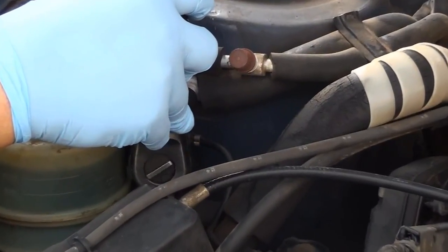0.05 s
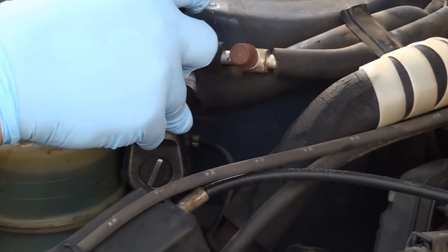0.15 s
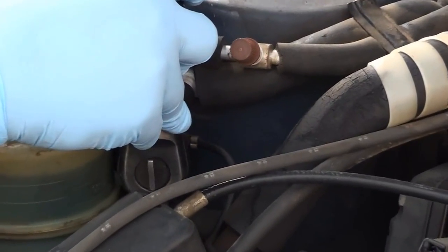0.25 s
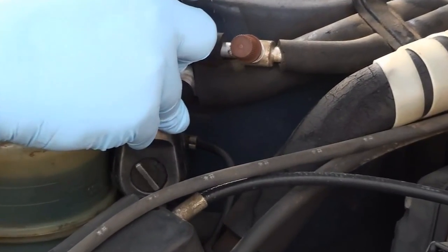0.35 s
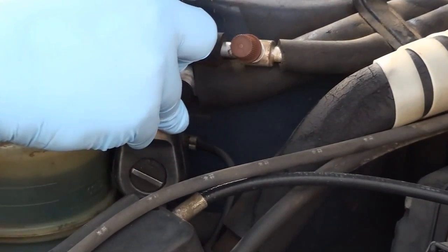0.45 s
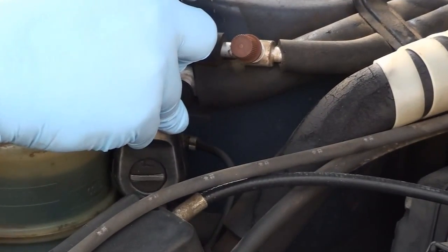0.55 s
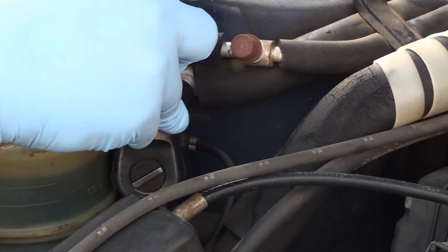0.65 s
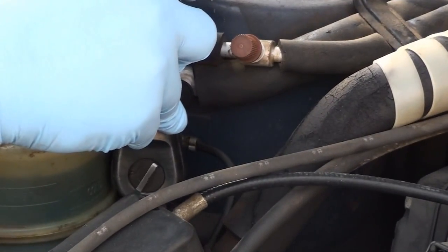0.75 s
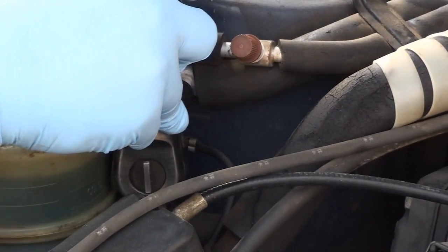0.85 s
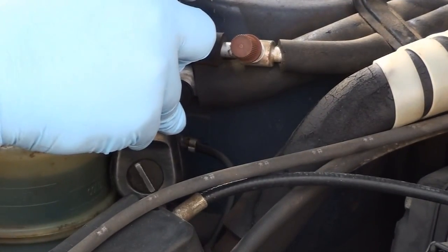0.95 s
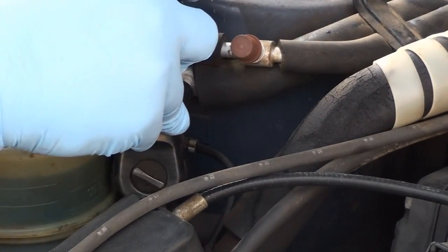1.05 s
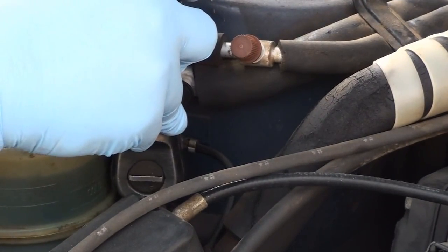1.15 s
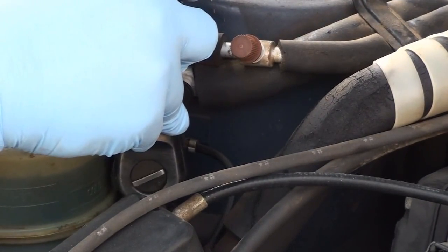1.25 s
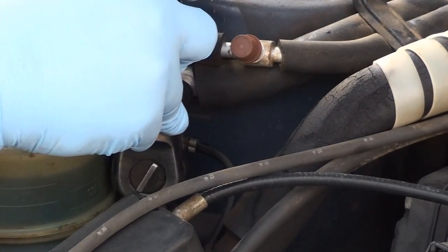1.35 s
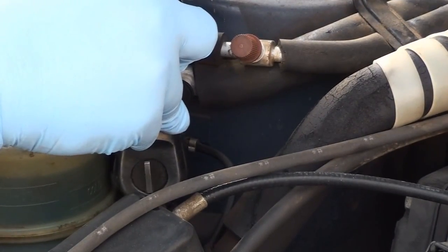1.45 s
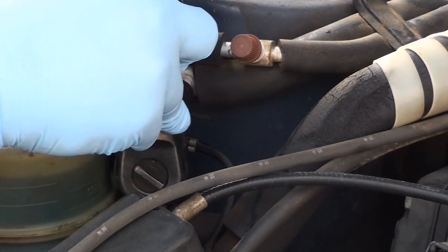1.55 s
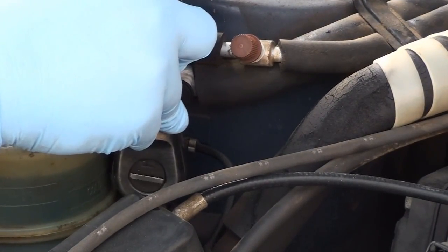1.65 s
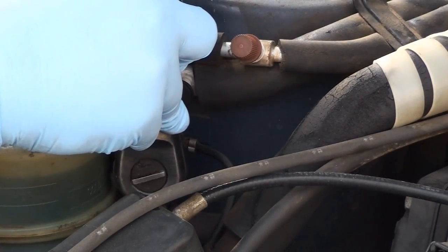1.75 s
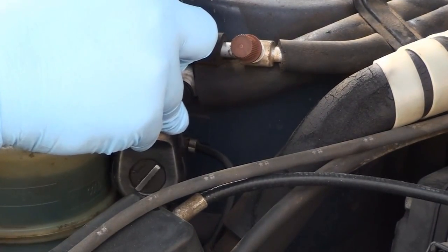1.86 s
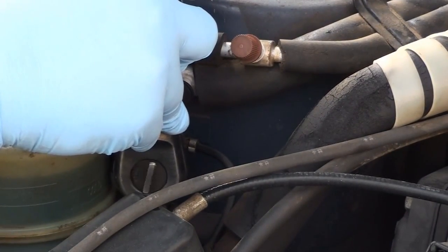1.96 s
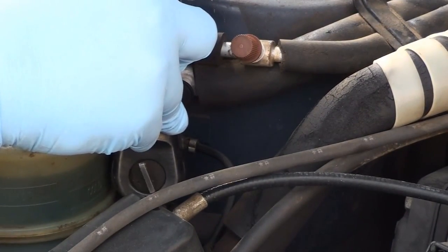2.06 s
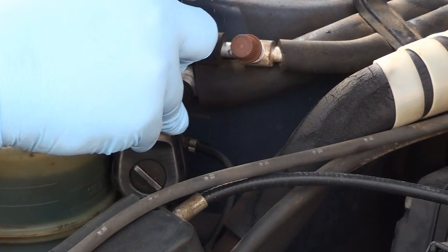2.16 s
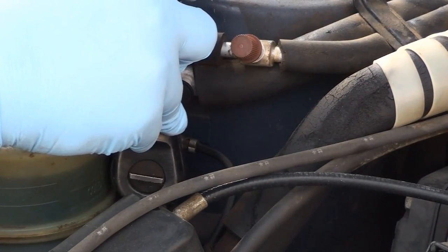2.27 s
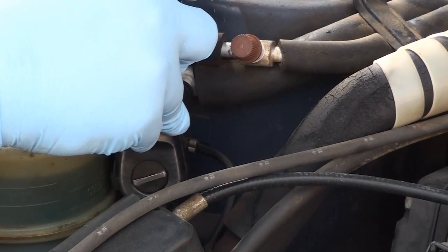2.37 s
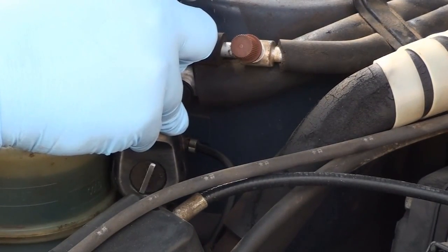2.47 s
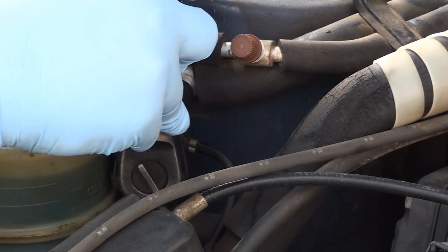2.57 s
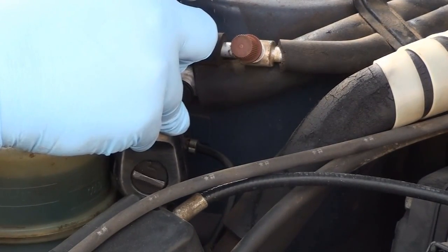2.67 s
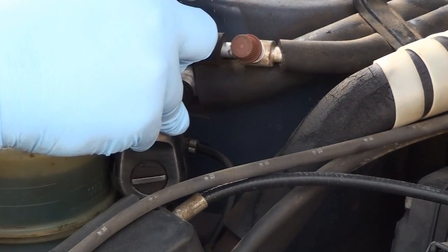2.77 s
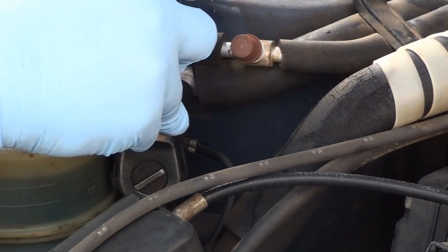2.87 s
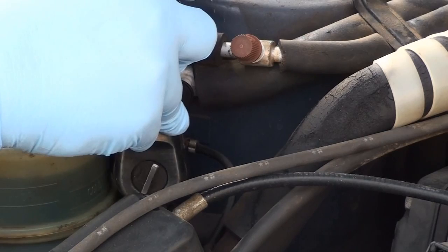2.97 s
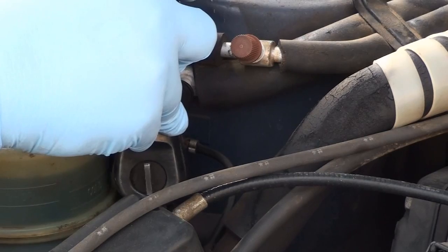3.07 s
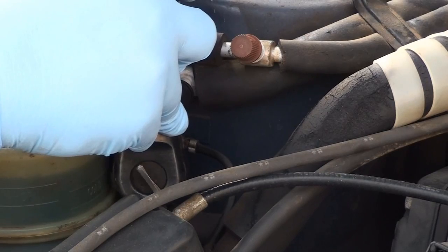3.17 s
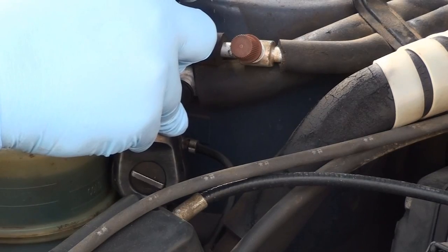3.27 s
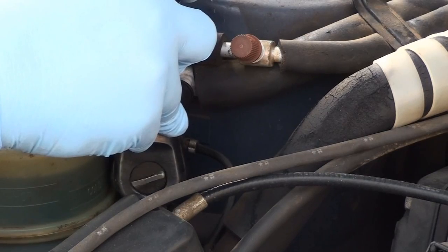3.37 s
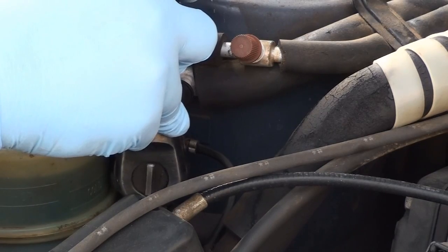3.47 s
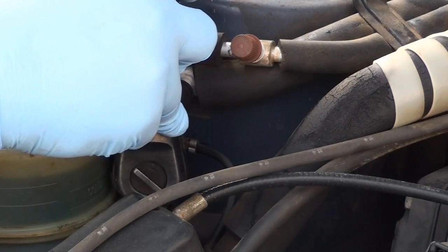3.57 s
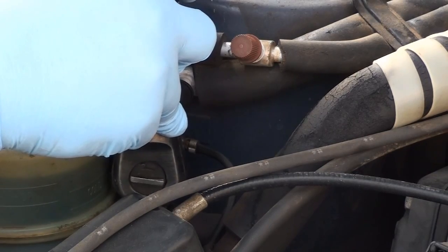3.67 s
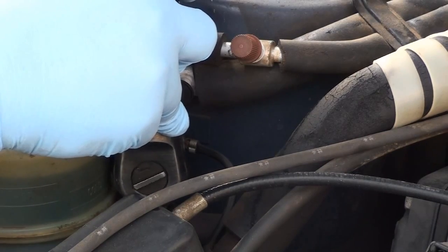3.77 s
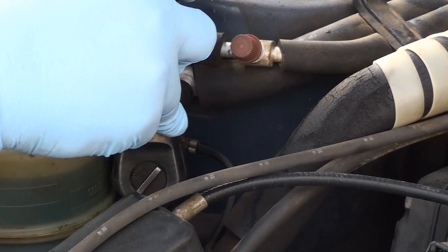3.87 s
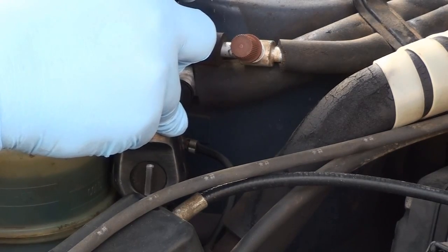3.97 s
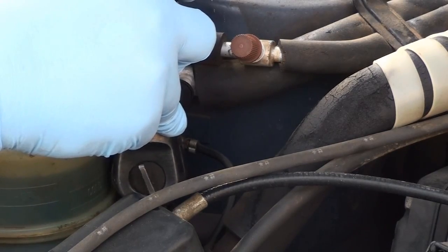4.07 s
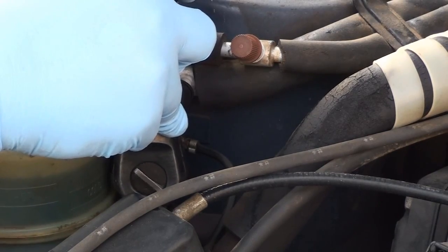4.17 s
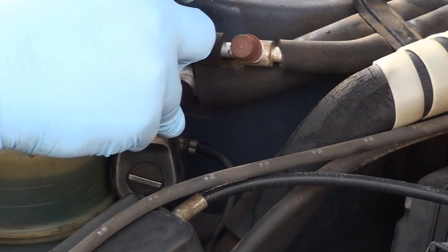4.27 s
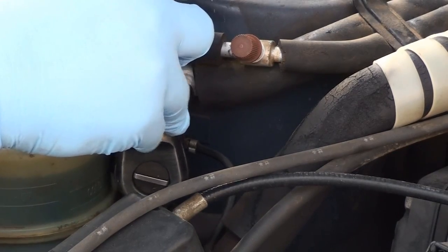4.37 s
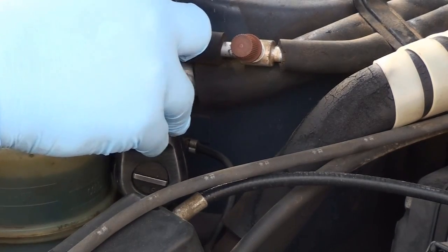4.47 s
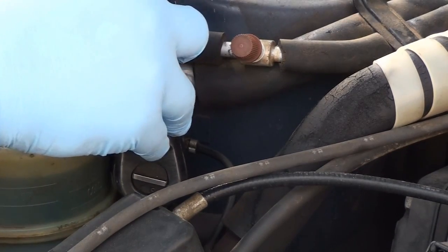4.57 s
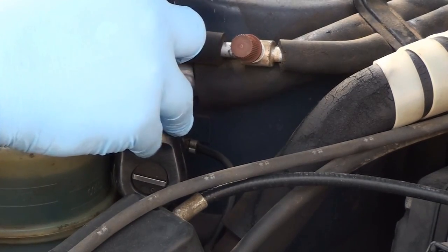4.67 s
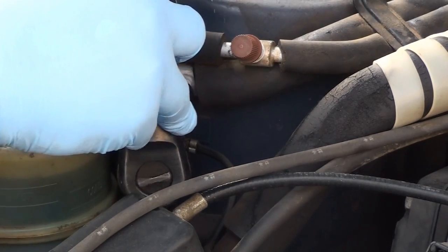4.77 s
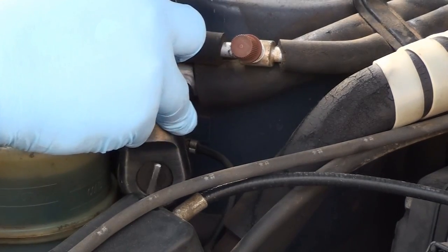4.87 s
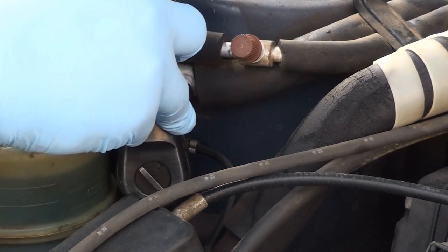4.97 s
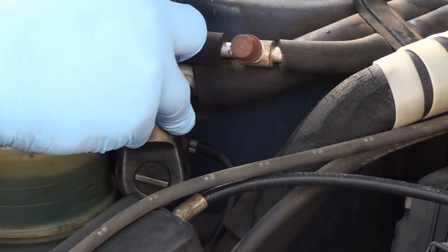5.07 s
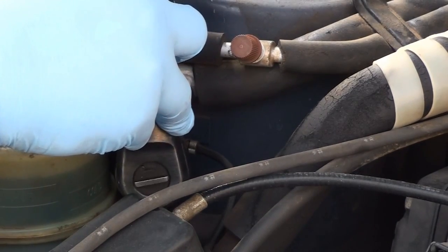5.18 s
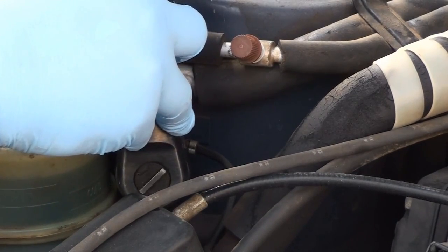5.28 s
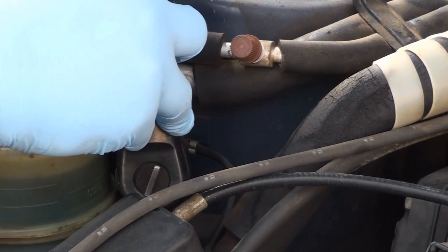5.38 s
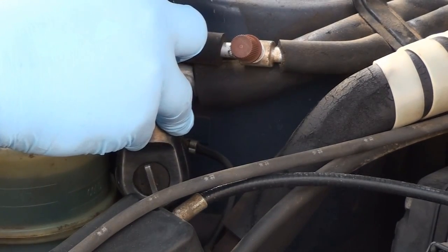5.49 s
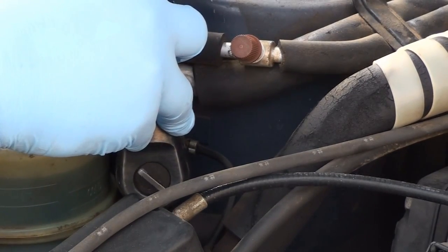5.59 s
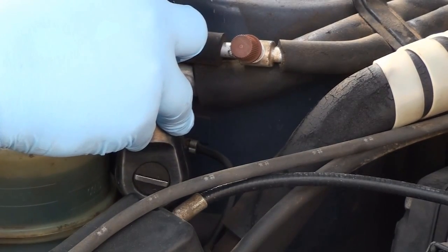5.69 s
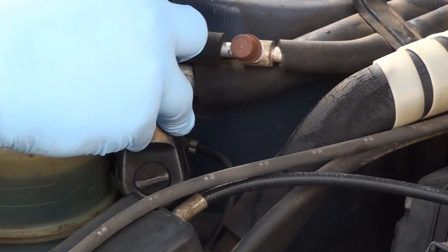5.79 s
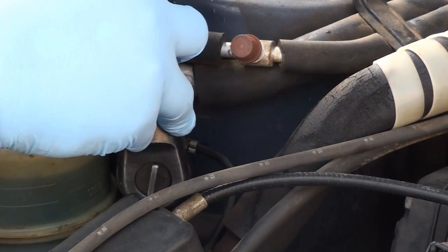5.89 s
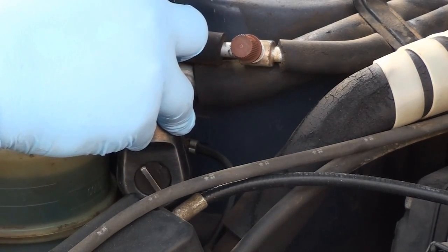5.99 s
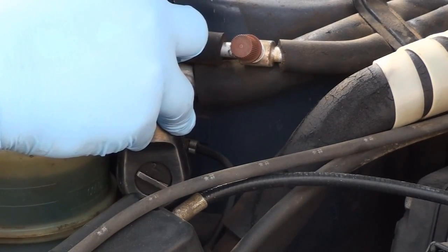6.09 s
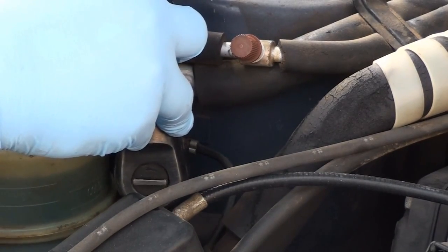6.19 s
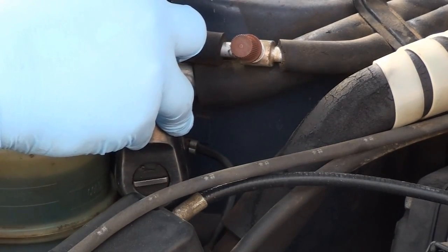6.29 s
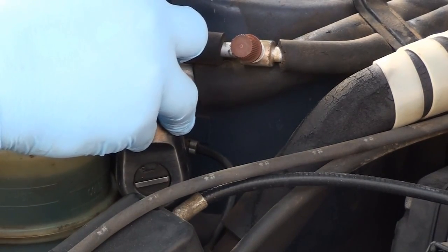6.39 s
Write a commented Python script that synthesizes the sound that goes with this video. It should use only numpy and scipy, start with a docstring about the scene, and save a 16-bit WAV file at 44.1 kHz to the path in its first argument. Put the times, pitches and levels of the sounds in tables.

```python
"""An air ratchet turns a bolt in an engine bay, one long run and one short run, close to an overloaded microphone.
Its four-vane air motor whines in orders of the vane rate and, when slow, puffs singly into a ringing muffler.
Exhaust air hisses as port-shaped noise pulsing with the motor. A geared-down crank rocks the ratchet head,
so a pawl ticks and the yoke knocks; when the trigger closes the motor chugs down over faint yard noise."""
import sys
import numpy as np
from scipy import signal
from scipy.fft import rfft, irfft, next_fast_len
from scipy.io import wavfile

SR = 44100
rng = np.random.default_rng(int(sys.argv[2]) if len(sys.argv) > 2 else 0)


def inscribe(sig):
    """Save sig as 16-bit PCM at rate SR to the path in sys.argv[1].

    A 1-D sig is mono; a 2-D sig holds one channel per row.
    Samples are clipped to [-1, 1] before scaling.
    """
    pcm = np.round(np.clip(np.atleast_2d(sig).T, -1, 1) * 32767)
    wavfile.write(sys.argv[1], SR, pcm.astype(np.int16))


N = 284004


def from_db(db):
    """Decibels to gain."""
    return 10 ** (np.asarray(db) / 20)


def rms_one(x):
    """Scaled to rms 1."""
    return x / np.sqrt(np.mean(x ** 2) + 1e-20)


def in_time(rows):
    """The second column of a table as a curve over all samples."""
    s, values = np.transpose(rows)
    return np.interp(np.arange(N) / SR, s, values)


def at_hz(points, hz):
    """A spectrum table read on a log-frequency axis."""
    table_hz, values = np.transpose(points)
    return np.interp(np.log(np.maximum(hz, 1)), np.log(table_hz), values)


def resonances_db(peaks, hz):
    """Sum of bell-shaped peaks and dips in dB, each width taken at half its dB height."""
    return sum(db / (1 + (2 * (hz - top_hz) / width_hz) ** 2) for top_hz, width_hz, db in peaks)


def bumps_in_time(rows):
    """Sum of bell-shaped level changes in dB; rows are (time [s], half length [s], level [dB])."""
    t = np.arange(N) / SR
    return sum(db * np.exp(-((t - s) / half_s) ** 2) for s, half_s, db in rows)


def drift(rate):
    """Slow chance with spread 1: noise at a sixteenth of the sample rate through two poles at rate [Hz]."""
    step = 16   # samples
    r = np.exp(-2 * np.pi * rate * step / SR)
    noise = rng.standard_normal(N // step + 4002)
    slow = signal.lfilter([1], [1, -2 * r, r * r], noise)[4000:]   # settled part only
    return np.interp(np.arange(N) / step, np.arange(len(slow)), rms_one(slow))


def ring(clicks, hz, t60):
    """Two-pole resonator: a unit click sets a sine of about height 1 ringing, down 60 dB after t60 [s]."""
    r, w = from_db(-60 / (t60 * SR)), 2 * np.pi * hz / SR
    return signal.lfilter([0, np.sin(w)], [1, -2 * r * np.cos(w), r * r], clicks + 1e-18)


def stereo_noise(gain, likeness):
    """Two-channel noise with a gain for each frequency bin and a set left-right likeness; rms 1."""
    alike = np.clip(at_hz(likeness, np.fft.rfftfreq(N, 1 / SR)), 0, 1)
    mid, side = rfft(rng.standard_normal((2, N)))
    spectrum = np.sqrt(1 + alike) * mid + np.sqrt(1 - alike) * side * [[1], [-1]]
    return rms_one(irfft(gain * spectrum, N))


def once_a_turn(turns):
    """Unit clicks where a count of turns passes a whole number."""
    return np.maximum(np.diff(np.floor(turns), prepend=np.floor(turns[0])), 0)


def filtered(x, response):
    """A frequency response, given as a function of Hz, applied with room for its tail."""
    size = next_fast_len(N + 8192)
    return irfft(rfft(x, size) * response(np.fft.rfftfreq(size, 1 / SR)), size)[..., :N]


def surge(since, rise_s, top_db, fall_db_per_s):
    """A level that climbs to its top soon after a moment, then falls steadily."""
    late = since - rise_s
    return top_db + np.minimum(35 * late / rise_s, -fall_db_per_s * late)


def one_run(speed, opens, closes, drain_db_per_s, empty_s):
    """Vane rate, hiss, whine fade and chug level that follow from one pull of the trigger."""
    t = np.arange(N) / SR
    on, off = t - opens, np.maximum(t - closes, 0)

    # share of loaded speed: quarter-sine climb, then coasting down exponentially
    spin_up_s, run_down_s = .085, .057
    share = np.sin(np.pi / 2 * np.clip(on / spin_up_s, 0, 1)) * np.exp(-off / run_down_s)

    # a leak precedes full air
    leak_db, leak_lead_s, leak_s = -13.3, .007, .011
    opening_db = np.interp(on + leak_lead_s, [-.003, .003, leak_s, leak_s + .004],
                           [-80, leak_db, leak_db, 0])
    run_out_db_per_s = 400   # on top of the draining
    hiss_db = -12.7 + opening_db - drain_db_per_s * off - run_out_db_per_s * np.maximum(off - empty_s, 0)

    # the whine forms late, breaks fast and is weaker below speed
    forms_s, edge_db_per_s, slow_loss_db = .042, 3200, 25
    fade_db = edge_db_per_s * (np.minimum(on - forms_s, 0) - off) - slow_loss_db * (1 - share)

    start_db = surge(on, rise_s=.022, top_db=-13, fall_db_per_s=480)
    stop_db = surge(t - closes, rise_s=.01, top_db=-14, fall_db_per_s=290)
    idle_db = -50 + fade_db
    chug_db = np.max([start_db, stop_db, idle_db], axis=0)
    return share * in_time(speed), hiss_db, fade_db, chug_db


def motor():
    """Two trigger pulls joined: the stronger run sets vane rate, hiss, whine fade and chug at each moment."""
    # motor speed under load with the trigger held: (time [s], vane rate [Hz])
    long_run = [(0.03, 771.8), (0.07, 779.2), (0.27, 776.2), (0.33, 766.5), (0.59, 773.2), (0.97, 772.2),
                (1.25, 767.2), (1.33, 774.5), (1.45, 775.3), (1.47, 771.0), (2.09, 775.7), (2.21, 767.7),
                (2.47, 765.7), (2.53, 754.4), (2.69, 766.9), (3.31, 771.9), (3.47, 754.1), (3.71, 771.6),
                (3.87, 772.6), (4.13, 767.7), (4.19, 756.8), (4.215, 746)]
    short_run = [(4.8, 866), (4.862, 865), (4.93, 837), (5.03, 824), (5.14, 806.9), (5.22, 795.7),
                 (5.44, 778.5), (5.58, 770), (5.77, 767.5), (5.93, 754.5), (6.0, 763), (6.08, 765),
                 (6.14, 748), (6.185, 725)]
    # trigger pulls: (opens [s], closes [s], air drains [dB/s], air runs out after closing [s])
    trigger = [(-1, 4.224, 180, .255), (4.709, 6.189, 215, .14)]
    runs = [one_run(speed, *pull) for speed, pull in zip((long_run, short_run), trigger)]
    floors = [[5], [-90], [-60], [-90]]
    return np.maximum(np.max(runs, axis=0), floors)


def crank_turns(vanes):
    """The gears turn the crank 3 times for 17 rotor turns of four vanes; each run has its own crank angle."""
    # one pawl drop in each run, where the crank count is zero: (long run [s], short run [s])
    pawl_drops = (.064, 4.861)
    first, second = [vanes[round(s * SR)] for s in pawl_drops]
    t = np.arange(N) / SR
    return 3 / 17 / 4 * (vanes - np.where(t < 4.6, first, second))


def whine(vanes, vane_hz, crank, fade_db):
    """Vane tones: crank load wobbles phase and strength, slip blurs high orders, which form last, break first."""
    # whine orders: (multiple of vane rate [1], level at full air before bay peaks and swells [dB])
    orders = [(1, -19.1), (2, -24.6), (3, -15), (4, -27.6), (5, -24.5), (6, -30.5), (7, -42.7), (8, -37.5),
              (9, -31.6), (10, -26.3), (11, -31.5), (.75, -45.5), (5.25, -45), (5.75, -42), (8.5, -39.5),
              (12, -31.5), (13, -33.5), (14, -33.5), (15, -40)]
    # narrow engine bay peaks and dips, crossed as the speed changes: (frequency [Hz], width [Hz], level [dB])
    bay_peaks = [(761, 31, -5.8), (795, 43, 4.2), (829, 31, -10.9), (1513, 18, -15), (1566, 20, -14.4),
                 (2165, 60, -9), (2305, 125, -21.5), (2611, 156, -16.8), (2930, 70, -9), (3025, 116, 6),
                 (3226, 49, -5.9), (3350, 83, 10.9), (3680, 150, 6.5), (3797, 45, -6.5), (3961, 51, -15.1),
                 (4177, 25, -8.3), (4430, 80, 6), (4577, 68, -6.2), (5170, 90, 3), (5496, 328, 16),
                 (6133, 110, 6.5), (6390, 170, 8), (6856, 193, 7.6), (7366, 102, 9.6), (7686, 102, -15.2),
                 (8146, 49, -18.3), (8411, 150, 9), (10330, 150, 7), (11451, 173, 11.4)]
    # single whine orders swell or sink for a moment:
    # (order [1], time [s], half length [s], level [dB])
    swells = [(1, 1.1, .3, -2.5), (2, .05, .2, -7), (3, .2, .3, -8), (3, 1.5, .6, 5), (4, 1.6, .4, -1.5),
              (5, .1, .25, -5), (5, 1.15, .25, 4), (5, 2.55, .09, -4), (5, 3.65, .33, -4.5),
              (5, 5.98, .2, 3), (6, 1.9, .3, 2), (6, 5.8, .3, -5), (8, .6, .9, -3), (8, 3.9, .4, 3)]
    # stereo placing: (frequency [Hz], left minus right [dB])
    pan = [(770, -3), (1540, -5.5), (2310, -1.5), (3080, 2), (5400, -3.5), (12000, 1.5)]
    # stereo phase: (frequency [Hz], left ahead of right [rad])
    left_lead = [(60, 0), (770, -1.18), (1540, -1.94), (3080, -0.84), (5000, -0.98), (8000, 0.56)]

    strain = np.clip((767 - vane_hz) / 14, 0, 1)   # a motor slowed by load runs unevenly
    slip = (.035 + .028 * strain) * drift(120)
    flutter_db = .9 + 2.2 * strain
    angle = 2 * np.pi * vanes + 0.11 * np.sin(2 * np.pi * crank) + slip
    hz = np.arange(SR // 2)
    bay_db = resonances_db(bay_peaks, hz)

    tones = np.zeros(N)
    for k, db in orders:
        swell_db = bumps_in_time([row[1:] for row in swells if row[0] == k])
        level_db = db + swell_db + np.interp(k * vane_hz, hz, bay_db) + .8 * drift(4.7)
        breakup_db = fade_db * (1 + (k - 1) / 3)
        gain = np.sqrt(2) * from_db(level_db + breakup_db + flutter_db * drift(56))
        tones += gain * np.sin(k * angle + rng.uniform(0, 2 * np.pi))
    crank_load_db = 1.64 * np.cos(2 * np.pi * (crank - .8))

    def two_sides(hz):
        opposite = np.array([[1], [-1]])
        level = from_db(at_hz(pan, hz) / 2 * opposite)
        return level * np.exp(.5j * at_hz(left_lead, hz) * opposite)

    return filtered(tones * from_db(crank_load_db), two_sides)


def exhaust(vanes, crank, hiss_db):
    """Jet noise through the port resonances, pulsing with every vane, rotor turn and crank turn."""
    # jet spectrum, relative: (frequency [Hz], density [dB per Hz])
    jet_spectrum = [(30, -44), (100, -78), (250, -33.5), (600, -22), (900, -20), (1400, -23.5),
                    (2000, -21.5), (3000, -19.5), (5000, -19), (7500, -18), (10500, -12), (12500, -16.5),
                    (16000, -28), (20000, -14)]
    # exhaust port resonances and dips: (frequency [Hz], width [Hz], level above the plain jet [dB])
    nozzle = [(3530, 370, 4.5), (5490, 270, 6.5), (6340, 900, 6.5), (8350, 160, 12), (9880, 170, 9.5),
              (11360, 350, 7), (4600, 140, 2), (1315, 190, -6.5), (2630, 160, -3.5)]
    # (frequency [Hz], left-right likeness [0-1])
    likeness = [(60, 0.54), (130, 0.66), (290, 0.43), (640, 0.76), (1410, 0.24), (3100, 0.79), (6820, 0.78),
                (15000, 0.93)]
    # (frequency [Hz], left minus right [dB])
    balance = [(60, 0), (180, -6), (550, 7.5), (1650, -8), (4970, 0), (15000, 5)]

    hz = np.fft.rfftfreq(N, 1 / SR)
    plain_db = at_hz(jet_spectrum, hz) + at_hz(balance, hz) / 2 * [[1], [-1]]
    port_air = stereo_noise(from_db(plain_db + resonances_db(nozzle, hz)), likeness)
    plain_air = stereo_noise(from_db(plain_db), likeness)
    fast = np.clip((hiss_db + 30) / 14, .15, 1)   # share of the flow fast enough to excite the ports
    jet = np.sqrt(fast) * port_air + np.sqrt(1 - fast) * plain_air

    vane_pulse = 0.18 * np.cos(2 * np.pi * vanes)
    rotor_pulse = 0.065 * np.cos(np.pi * vanes / 2)
    crank_pulse = 0.042 * np.cos(2 * np.pi * (crank - .45))
    pulsing = 1 + vane_pulse + rotor_pulse + crank_pulse
    return weak_outflow(jet, hiss_db) * pulsing * from_db(hiss_db - 1 + .4 * drift(25))


def weak_outflow(jet, hiss_db):
    """At low pressure the air whistles faintly in the housing, flickers and leaves in puffs."""
    # trapped air escapes as a vane creeps past the port:
    # (time [s], level above the hiss [dB], half length [s])
    last_puffs = [(4.348, 7, .004), (4.381, 3, .005), (4.397, 4, .005), (4.447, 6, .007), (4.473, 5, .006),
                  (6.247, 4, .004), (6.3, 2, .006)]
    puffs_db = bumps_in_time([(s, half_s, db) for s, db, half_s in last_puffs])
    weak = np.clip((-15 - hiss_db) / 14, 0, 1)
    housing = signal.sosfilt(signal.butter(2, [3200, 4500], "band", fs=SR, output="sos"), jet)
    flicker_db = .9 * weak * drift(140)
    return (jet + weak * housing) * from_db(puffs_db + flicker_db)


def chug(vanes, vane_hz, chug_db):
    """Single uneven vane puffs ring the muffler while the motor is slow."""
    # muffler resonances: (frequency [Hz], width that sets the ring time [Hz], relative level [dB])
    muffler = [(900, 380, 3), (620, 250, -3), (330, 200, -12), (3500, 900, -14)]
    uneven = once_a_turn(vanes + .03 * drift(150)) * from_db(2.2 * rng.standard_normal(N))
    puffs = uneven / np.sqrt(vane_hz / 350)   # crowded puffs are each weaker
    rung = sum(from_db(db) * ring(puffs, hz, 2.85 / width_hz) for hz, width_hz, db in muffler)
    return from_db(chug_db) * signal.sosfilt(signal.butter(2, 320, "high", fs=SR, output="sos"), rung)


def bay(x):
    """Short echoes off the engine bay, the signs differing between the two sides."""
    # engine bay walls: (delay [s], level [dB])
    echoes = [(.0043, -13), (.0071, -13), (.0118, -14), (.0167, -15), (.0239, -16), (.0331, -18)]
    out = np.stack([x, x])
    for k, (delay_s, db) in enumerate(echoes):
        lag = round(delay_s * SR)
        signs = [[(-1) ** k], [(-1) ** (k // 2)]]
        out[:, lag:] += from_db(db) * x[:N - lag] * signs
    return out


def ratchet_head(crank, running):
    """Each crank turn drops the pawl on a tooth and knocks the yoke twice; both ring as struck metal."""
    # pawl modes: (frequency [Hz], relative level [dB], 60 dB decay [s])
    pawl = [(8705, -2, 0.036), (9550, 6.5, 0.0067), (8100, -2, 0.015), (6210, -17, 0.0099)]
    # yoke modes: (frequency [Hz], relative level [dB], 60 dB decay [s])
    yoke = [(307.8, -10, 0.14), (343.6, -16, 0.36), (388, -3, 0.065), (474, -13.5, 0.17), (586.2, -28, .06),
            (217, -24.5, .05), (1200, -26, .015)]
    # yoke reversing: (crank turns after the pawl drop [1], strike level [dB])
    reversals = [(.31, -31.5), (0.461, -43.5)]
    # pawl as the head slows: (time [s], strike level [dB])
    last_ticks = [(4.308, -25), (4.346, -28.5), (6.1908, -8.5), (6.243, -23), (6.377, -60)]

    drops = once_a_turn(crank) * running * from_db(-16 + 2.6 * rng.standard_normal(N))
    for s, db in last_ticks:
        drops[round(s * SR)] = from_db(db)
    scrape = np.convolve(drops, np.hanning(220))[:N] * rng.standard_normal(N) * 0.13   # the pawl skids 5 ms
    ticks = sum(from_db(db) * ring(scrape, hz, t60) for hz, db, t60 in pawl)

    strikes = sum(once_a_turn(crank - later) * from_db(db) for later, db in reversals)
    strikes = strikes * running * from_db(.8 * rng.standard_normal(N))
    knocks = sum(from_db(db) * ring(strikes, hz, t60) for hz, db, t60 in yoke)
    return ticks + knocks


def bumps():
    """Short low thumps: decaying sines whose start a low-pass softens."""
    # (time [s], level before the low-pass [dB], frequency [Hz])
    thumps = [(5.346, -40.5, 90), (5.385, -21.5, 109.3), (5.41, -45, 70.2), (5.432, -15, 132),
              (5.555, -38, 100), (5.666, -18, 119.4), (6.354, -38.5, 89.3), (6.373, -25, 80),
              (6.395, -41, 70)]
    out = np.zeros(N)
    for s, db, hz in thumps:
        click = np.arange(N) == round(s * SR)
        out += ring(from_db(db) * click, hz, t60=0.036)
    return signal.sosfilt(signal.butter(2, 260, fs=SR, output="sos"), out)


def surroundings():
    """Quiet yard noise, in which a faint far noise around 1.3 kHz rises for a while."""
    # yard spectrum, relative: (frequency [Hz], density [dB per Hz])
    yard_spectrum = [(18, -34), (30, -4), (97, -0.5), (425, -8), (460, -13.5), (634, -8.5), (973, -12.5),
                     (2290, -19.5), (15700, -36.5), (18000, -53)]
    # (frequency [Hz], left-right likeness [0-1])
    likeness = [(60, 0.72), (130, 0.55), (300, .3), (3000, .1), (7000, .6), (15000, 0.92)]
    # far noise: (time [s], rise of its band [dB])
    far_rise = [(4.5, 0), (4.58, -1), (4.64, 6), (4.7, 3), (6.3, 9.5), (6.44, 0)]
    gain = from_db(at_hz(yard_spectrum, np.fft.rfftfreq(N, 1 / SR)))
    yard = from_db(-55.5) * stereo_noise(gain, likeness)
    far = signal.sosfilt(signal.butter(2, [850, 1800], "band", fs=SR, output="sos"), yard)
    return yard + far * (from_db(in_time(far_rise)) - 1)


def scene():
    """Motor, exhaust, ratchet head and the quiet surroundings."""
    vane_hz, hiss_db, fade_db, chug_db = motor()
    vanes = np.cumsum(vane_hz) / SR   # vanes passed so far
    crank = crank_turns(vanes)
    motor_tones = whine(vanes, vane_hz, crank, fade_db)
    air = exhaust(vanes, crank, hiss_db)
    slow_motor = bay(chug(vanes, vane_hz, chug_db))
    tool = ratchet_head(crank, running=from_db(fade_db)) + bumps()
    tool_sides = tool * from_db([[-.6], [.6]])   # slightly right
    return motor_tones + air + slow_motor + tool_sides + surroundings()


def record(dry):
    """The input overloads; the stereo width narrows by frequency, and the weak top treble is cut off."""
    # stereo difference signal: (frequency [Hz], level [dB])
    width = [(30, 0.5), (200, -4.5), (500, -6), (8000, -3.5), (10500, -5.5), (12000, -29), (20000, -20)]
    drive_db, clip_top, knee = 3.0, .42, 12   # a higher knee bends later and harder
    loud = dry * from_db(drive_db)
    left, right = loud / (1 + np.abs(loud / clip_top) ** knee) ** (1 / knee)
    mid = (left + right) / 2
    side = filtered((left - right) / 2, lambda hz: from_db(at_hz(width, hz)))

    def tone(hz):
        top_treble = from_db(-24) * (hz < 18600)
        low_cut = hz / np.hypot(hz, 25)
        return np.where(hz > 16550, top_treble, 1) * low_cut

    coloured = filtered(np.stack([mid + side, mid - side]), tone)
    return signal.sosfilt(signal.cheby2(14, 60, 19100, fs=SR, output="sos"), coloured)


dry = scene()
out = record(dry)
inscribe(out)
```